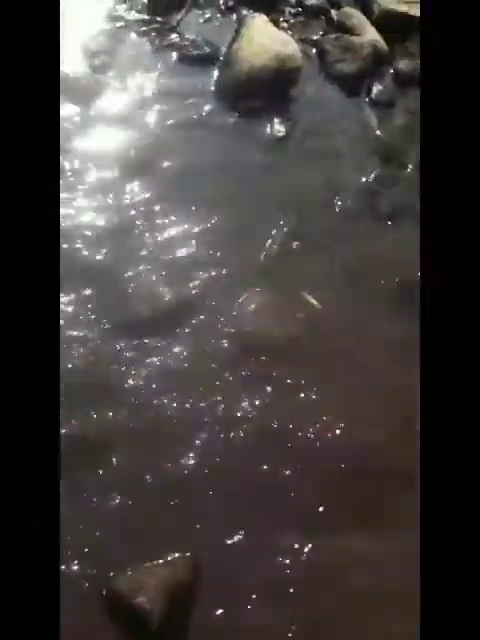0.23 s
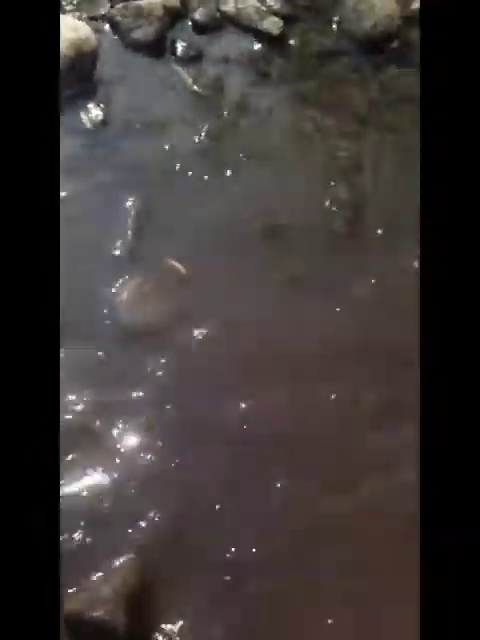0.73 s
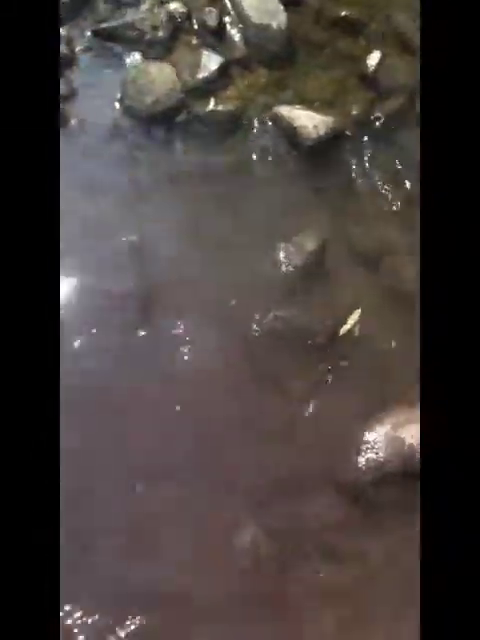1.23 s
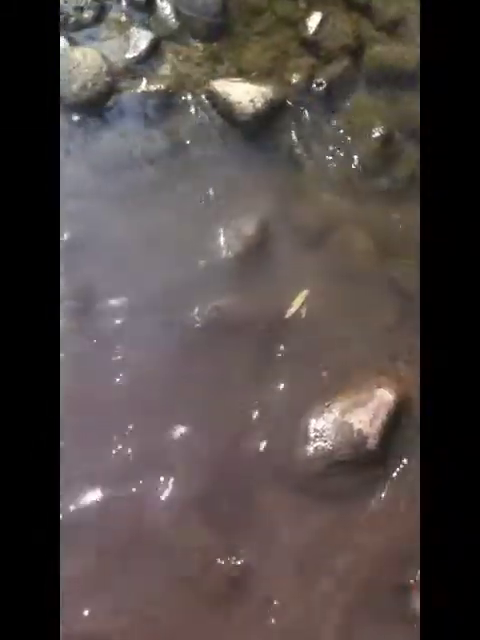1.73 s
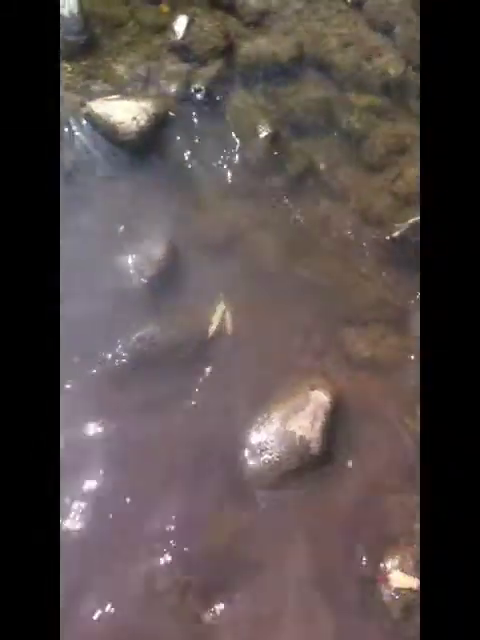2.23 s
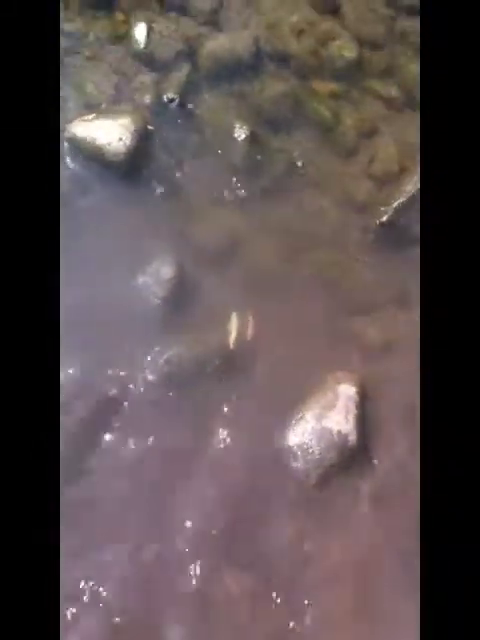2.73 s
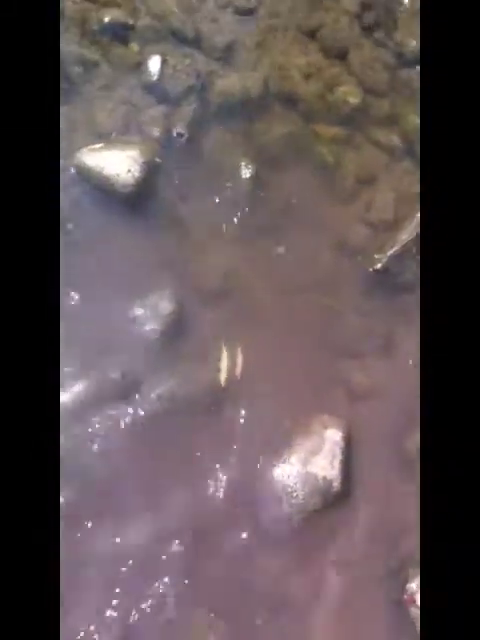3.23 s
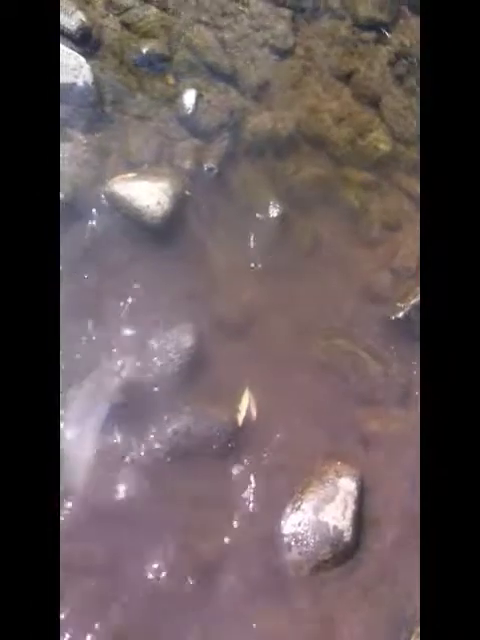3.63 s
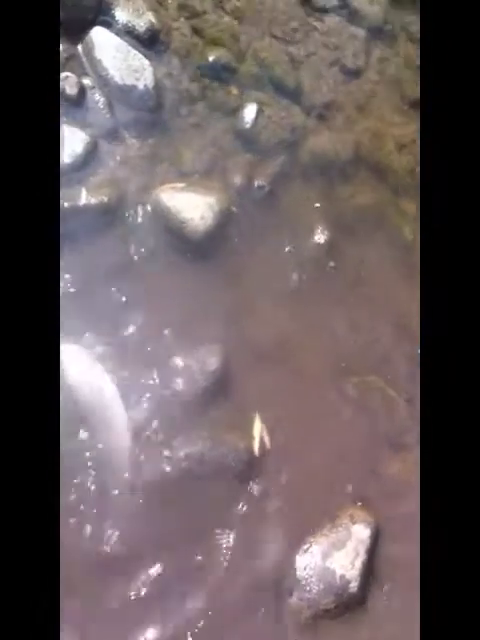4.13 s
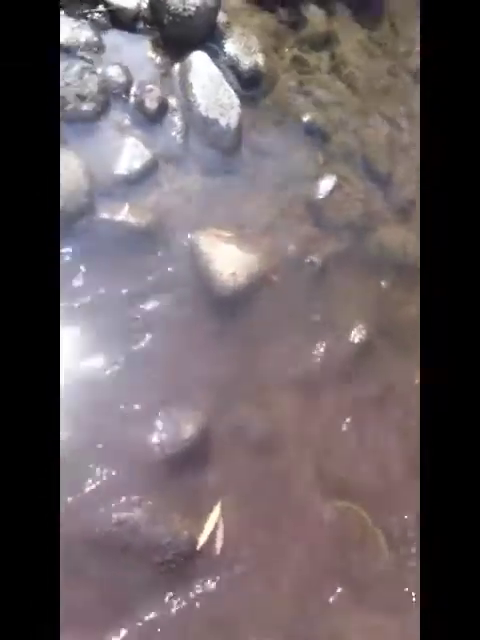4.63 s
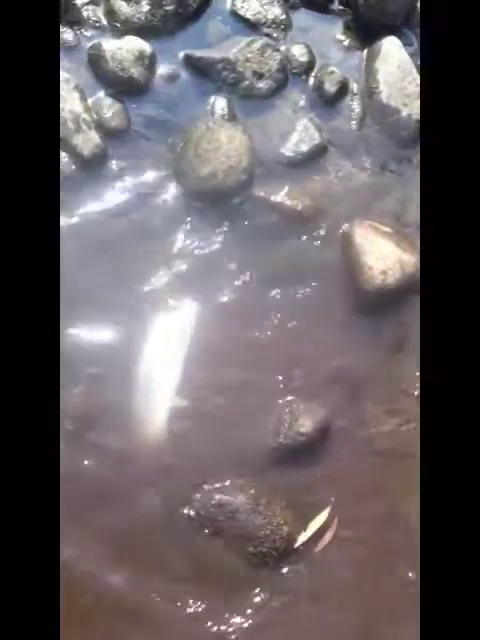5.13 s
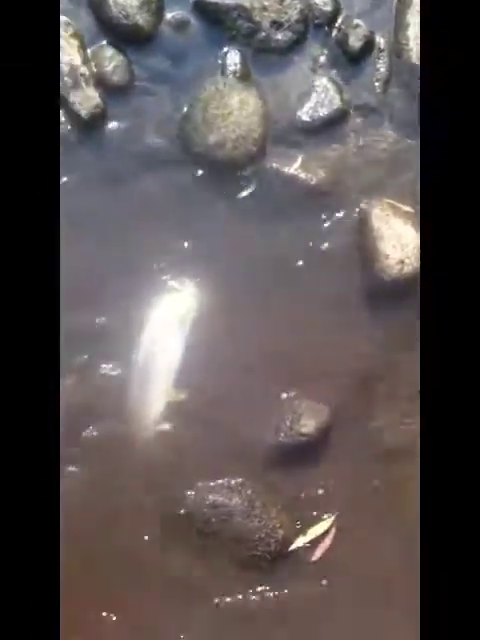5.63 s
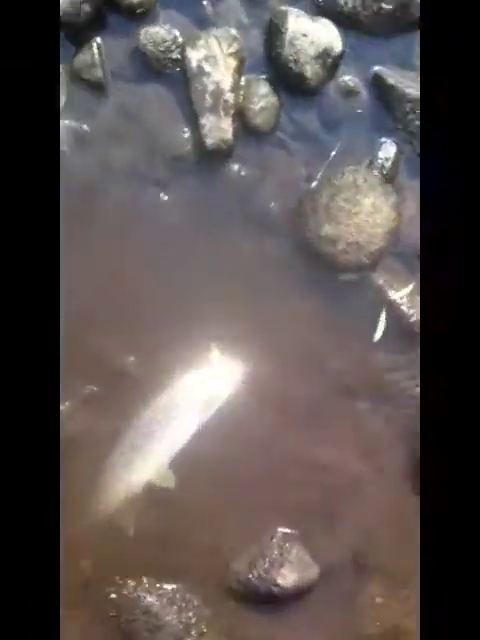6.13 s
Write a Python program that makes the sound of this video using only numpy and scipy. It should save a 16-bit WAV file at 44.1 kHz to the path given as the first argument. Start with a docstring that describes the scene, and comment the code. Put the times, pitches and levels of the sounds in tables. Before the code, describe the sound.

Shallow stream water trickles, plinks and gurgles close up in irregular bursts, insects trill thinly, and low bumps shake the microphone near the end.

```python
"""Shallow rocky stream

Water trickles and sloshes close to a small hand-held microphone: bubbles ring as dying sines with sliding pitch,
drops tick as sharp snaps wrapped in brief hiss, and the riffle hisses further off as patchy noise. Insects trill
and chirp on the bank, with tones and noise pulsed by their wing strokes. Low bumps shake the microphone, mostly
near the end, where something also scrapes it once. A thin high whine runs throughout."""
import sys
import numpy as np
from scipy import signal
from scipy.fft import rfft, irfft
from scipy.io import wavfile
from scipy.ndimage import uniform_filter1d

SR = 44100
rng = np.random.default_rng(int(sys.argv[2]) if len(sys.argv) > 2 else 0)


def transcribe(u):
    """Save the signal u as a 16-bit wav file named by the first command-line argument.

    u: samples, shape (n,) or (channels, n), limited to [-1, 1]; the rate is SR.
    q: integer samples, one column per channel.
    """
    v = np.clip(np.atleast_2d(u).T, -1, 1)
    q = np.round(v * 32767).astype(np.int16)
    wavfile.write(sys.argv[1], SR, q)


def volts(x):
    """Linear amplitude factor 10**(x/20) for a level x in dB, scalar or array-like."""
    e = np.asarray(x, float) / 20
    return 10 ** e


N = 281342  # length in samples

# spectrum of the brightest drops: f/Hz, level/dB
TICK_BRIGHT = [(300, -30.5), (1200, 7.5), (2200, -10.5), (4000, 8.5), (6500, -9.5), (10000, -18),
               (16000, -35)]
# spectrum of the dullest, big drops: f/Hz, level/dB
TICK_DULL = [(300, -13), (800, 15), (1500, -10), (2200, 9), (3200, -19.5), (7000, -14), (16000, -44)]


def evened(x):
    """Scales a sound to an average strength (rms) of 1."""
    return x / np.sqrt(np.mean(x ** 2) + 1e-20)


def read(points, hz):
    """Reads a spectrum between its points, on a log-frequency axis."""
    f, value = np.transpose(points)
    return np.interp(np.log(hz + 1), np.log(f + 1), value)


def level_curve(rows):
    """Turns a table of times and decibels into a factor for every sample."""
    s, db = np.transpose(rows)
    return volts(np.interp(np.arange(N) / SR, s, db))


def add(mix, s, sound):
    """Mixes a sound in at a moment in seconds, cut off at the end of the scene."""
    part = mix[round(s * SR):][:len(sound)]
    part += sound[:len(part)]


def coloured(length, db_at):
    """Noise of rms 1 with the spectrum db_at(hz)."""
    hz = np.fft.rfftfreq(length, 1 / SR)
    spectrum = rfft(rng.standard_normal(length)) * volts(db_at(hz))
    return evened(irfft(spectrum, length))


def wander(span, size=N):
    """Smooth chance of rms 1 that changes over about span samples."""
    once = uniform_filter1d(rng.standard_normal(size), span)
    return evened(uniform_filter1d(once, span))


def resonate(x, hz, width):
    """A resonance applied twice, for steep sides; width in Hz is that of one pass."""
    r = np.exp(-np.pi * width / SR)
    poles = [1, -2 * r * np.cos(2 * np.pi * hz / SR), r * r]
    once = signal.lfilter([1, -1], poles, x)
    return evened(signal.lfilter([1, -1], poles, once))


def whine():
    """The thin tone of the electronics: a sine whose pitch wavers slowly."""
    # steady tones: f/Hz, level/dB
    whine_tones = [(14998, -82)]
    out = np.zeros(N)
    for hz, db in whine_tones:
        pitch = hz + 5 * wander(6000)
        out += volts(db) * np.sqrt(2) * np.sin(2 * np.pi * np.cumsum(pitch) / SR)
    return out


def riffle(patchy_db=1.44, flicker_db=0.67):
    """The far hiss of running water: random short-time spectra with small patches and a shared flicker."""
    # colour of the hiss: f/Hz, level/dB
    hiss_colour = [(35, -40), (60, -3.5), (140, 1.5), (400, -8.5), (800, -5.5), (1200, -4), (1850, -11.5),
                   (4000, -11.5), (6500, -13.5), (8500, -9), (9300, -11), (9900, -18), (12000, -17.5),
                   (14900, -15.5), (15800, -17), (16300, -48)]
    frames, hz = N // 128 + 5, np.fft.rfftfreq(512, 1 / SR)
    a, b, patches = rng.standard_normal((frames, 257, 3)).T
    patches = uniform_filter1d(patches, 6, axis=0)
    patches = evened(uniform_filter1d(patches, 16, axis=1))
    flicker = evened(uniform_filter1d(rng.standard_normal(frames), 6))
    level_db = read(hiss_colour, hz)[:, None] + patchy_db * patches + flicker_db * flicker
    hiss = signal.istft((a + 1j * b) * volts(level_db), nperseg=512, noverlap=384)[1][:N]
    return volts(-62) * evened(hiss)


def trill(strokes, hz, arch_hz=350, drift_hz=70, rasp_hz=110, sharp=3, uneven_db=1.8):
    """A tone let through once a wing stroke; its pitch arches in each stroke and drifts between them."""
    swing, size = np.cos(2 * np.pi * strokes), len(strokes)
    pitch = hz + arch_hz * (swing - .8) + drift_hz * wander(2500, size) + rasp_hz * wander(40, size)
    tone = np.sin(2 * np.pi * np.cumsum(pitch) / SR)
    gate = np.exp(sharp * (swing - 1))
    return evened(gate * volts(uneven_db * wander(700, size)) * tone)


def wing_pulses(strokes, sharp, click_share=.35):
    """Rough noise let through once a wing stroke, plus a click at each stroke."""
    gate = np.exp(sharp * (np.cos(2 * np.pi * strokes) - 1))
    clicks = np.diff(np.floor(strokes), prepend=0)
    noise = evened(gate * rng.standard_normal(len(strokes)))
    return (1 - click_share) * noise + click_share * evened(clicks)


def insects(strokes_per_s=29, chirp_width_hz=200):
    """Trilled phrases over a far chorus, and scattered calls whose wing strokes ring a narrow band."""
    # further insects that never pause: f/Hz, level/dB, wing strokes per second
    chorus = [(8520, -78, 26), (8900, -80, 29.6)]
    # phrases of the nearer trilling insects: t/s of the first wing stroke, length/s, level/dB, f/Hz
    phrases = [(0.018, 0.13, -70.5, 9000), (.286, 0.18, -72, 8600), (0.44, 0.2, -80, 9200),
               (0.719, .3, -72.5, 8850), (1.195, .1, -75, 8050), (1.473, .21, -75, 8700),
               (1.887, .19, -76, 8630), (2.144, 0.2, -73, 8900), (2.492, 0.11, -83, 8700),
               (2.748, 0.22, -70, 9200), (2.98, .105, -76, 8700), (3.15, .14, -76, 8700),
               (3.186, .17, -74, 9100), (3.325, .2, -78, 8700), (3.666, .135, -78, 8950),
               (3.813, 0.11, -75, 8560), (4.082, 0.21, -73.5, 9100), (4.196, 0.29, -75, 8700),
               (4.554, 0.28, -73, 9150), (4.697, 0.14, -74, 8500), (4.935, 0.25, -73, 9100),
               (5.209, 0.15, -71.5, 8600), (5.527, 0.36, -69.5, 8760), (6.035, 0.36, -72.5, 8650)]
    # short chirps at 75 to 78 pulses per second, and a few slower, lower trills:
    # t/s, length/s, level/dB, f/Hz, pulses per second
    calls = [(.4, 0.47, -74.5, 7660, 26), (1.02, 0.28, -71.5, 7640, 29), (1.62, .17, -75, 7700, 78),
             (1.95, 0.12, -73, 7700, 78), (2.28, .12, -77, 7700, 78), (2.39, 0.11, -76, 6800, 75),
             (2.64, .13, -79, 7700, 78), (2.92, .12, -76, 7680, 78), (3.01, .12, -78, 6850, 75),
             (3.22, .13, -74, 7700, 78), (3.34, 0.15, -80, 6940, 75), (3.54, .12, -73, 7640, 78),
             (3.94, .13, -71.5, 7700, 78), (4.27, 0.12, -74, 7600, 78), (4.5, 0.23, -78, 7800, 27),
             (6.22, 0.18, -71, 6850, 75)]
    out = np.zeros(N)
    for hz, db, per_s in chorus:
        strokes = np.cumsum(per_s + 1.5 * wander(9000)) / SR  # the pace wanders a little
        out += volts(db) * trill(strokes, hz)
    for s, length, db, hz in phrases:
        lead = min(s, .5 / strokes_per_s)  # half a stroke of run-up
        t = np.arange(-lead, length + lead, 1 / SR)
        phrase = trill(strokes_per_s * t, hz) * signal.windows.tukey(len(t), .4)
        add(out, s - lead, volts(db) * phrase)
    for s, length, db, hz, per_s in calls:
        t = np.arange(0, length, 1 / SR)
        call = resonate(wing_pulses(per_s * t + .5, sharp=1.8), hz, chirp_width_hz)
        add(out, s, volts(db) * call * signal.windows.tukey(len(t), .4))
    return out


def rumble(body_hz=150, width_hz=110, lumpy_db=3.5):
    """The microphone's low resonance, shaken restlessly by lumpy noise."""
    # strength of the rumble: t/s, level/dB
    restless = [(0., -73), (.35, -68.5), (.8, -76), (1.26, -65.5), (1.6, -76), (2.42, -71), (3.23, -79.5),
                (4.4, -76), (4.58, -68.5), (5.06, -77.5), (5.75, -61), (5.92, -54), (6.18, -65),
                (6.38, -60)]
    lumps = volts(lumpy_db * evened(uniform_filter1d(rng.standard_normal(N), 900)))
    return level_curve(restless) * resonate(lumps * rng.standard_normal(N), body_hz, width_hz)


def bumps(early=.85, sag=.5):
    """Single bumps on the microphone: short low swells that rise faster than they fall, with sagging pitch."""
    # t/s, level/dB, f/Hz, length/s
    knocks = [(2.5645, -50, 148, .027), (4.715, -47.5, 159, 0.028), (5.3518, -44.5, 192, .015),
              (5.641, -40.5, 222, 0.012), (5.6927, -39, 174, 0.014), (5.7148, -37.5, 163, 0.01),
              (5.7451, -35.5, 149, 0.033), (5.7676, -35.5, 163, 0.041), (5.837, -35.5, 174, 0.017),
              (5.8847, -45, 160, .04), (5.9211, -36.5, 180, 0.0257), (5.943, -24, 172, 0.015),
              (5.9593, -31.5, 150, 0.025), (6.0405, -33.5, 177, .018), (6.0892, -37.5, 203, 0.023),
              (6.114, -37.5, 164, 0.016)]
    out = np.zeros(N)
    for s, db, hz, length in knocks:
        t = np.arange(0, length, 1 / SR)
        push = np.sin(np.pi * (t / length) ** early) ** 2
        pitch = hz * (1 + sag * (.45 - t / length))
        phase = 2 * np.pi * np.cumsum(pitch) / SR - np.pi * hz * length
        add(out, s, volts(db) * push * np.cos(phase))
    return out


def scrape(start_s=5.9445, length_s=.019, level_db=-25.5, fade_db=-2):
    """One short scrape on the microphone: gritty noise whose treble swells and fades within the stroke."""
    # colour of the grit: f/Hz, level/dB
    grit_colour = [(60, -12), (160, 1.5), (400, -11), (750, -1.5), (1050, -4.5), (1600, -22.5), (2600, -20),
                   (4200, -21), (6000, -18.5), (10000, -33.5), (16000, -47)]
    size = round(length_s * SR)
    grit = coloured(4096, lambda hz: read(grit_colour, hz))
    low = signal.sosfilt(signal.butter(2, 1500, fs=SR, output="sos"), grit)[-size:]
    treble = (grit[-size:] - low) * 1.3 * signal.windows.tukey(size, .7)
    stroke = evened(low * signal.windows.tukey(size, .22) + treble)
    out = np.zeros(N)
    add(out, start_s, volts(level_db + fade_db * np.arange(size) / size) * stroke)
    return out


def random_drops(per_s, spread_db):
    """Single-sample hits at random moments, a few of them much stronger than the rest."""
    strength = volts(spread_db * np.minimum(rng.exponential(1, N), 4))
    return strength * (rng.random(N) < per_s / SR)


def spray(t60=0.0056):
    """Fine spray falling back after a splash: many tiny drops in a short shower, midway between dull and bright."""
    # t/s, length/s, level/dB
    showers = [(.84, .32, -59.5), (5.6, 0.15, -65.5), (5.856, 0.078, -64), (6.295, 0.085, -54)]
    t = np.arange(0, 4 * t60, 1 / SR)
    grain = signal.oaconvolve(random_drops(per_s=900, spread_db=3.5), volts(-60 * t / t60))[:N]
    patter = grain * coloured(N, lambda hz: .5 * (read(TICK_DULL, hz) + read(TICK_BRIGHT, hz)))
    out = np.zeros(N)
    for s, length, db in showers:
        shower = patter[round(s * SR):][:round(length * SR)]
        add(out, s, volts(db) * evened(shower) * signal.windows.tukey(len(shower), .4))
    return out


def ticks(hiss=0.57, lag_s=.0009, hiss_t60_s=.027, ragged_db=2.5, size=2048):
    """At each impact a faint hiss builds for a millisecond, then comes a sharp snap, then the hiss dies."""
    # drops and splashes hitting the surface: t/s, level/dB, dullness from 0 to 1
    impacts = [(0.0448, -41, 0.2), (.626, -43, 0.7), (.7946, -37, 0.33), (.853, -46, 0.2),
               (0.864, -43, 0.3), (.9348, -41, 0.5), (.9405, -42, .7), (1.0227, -46, 0.2),
               (1.0595, -42, .5), (1.135, -45, 0.4), (1.1505, -31, 0.36), (1.311, -46, 0.9),
               (1.719, -48, .25), (1.7595, -47, .9), (2.1936, -42, .64), (2.2186, -50, 0.2),
               (2.4009, -43, .4), (2.4047, -33.5, 0.32), (2.432, -44, 0.94), (3.164, -49, 0.8),
               (3.948, -52, .5), (3.9933, -44, 0.3), (4.0406, -44.5, 0.25), (5.0633, -45, .55),
               (5.4062, -38, .53), (5.4355, -29, 0.59), (6.0382, -45, .5), (6.2865, -46, .8),
               (6.305, -46, .5), (6.3115, -39.5, 0.6), (6.318, -40, .27), (6.343, -47, .37)]
    out, t, hz = np.zeros(N), np.arange(size) / SR, abs(np.fft.fftfreq(size, 1 / SR))
    for s, db, dull in impacts:
        colour_db = dull * read(TICK_DULL, hz) + (1 - dull) * read(TICK_BRIGHT, hz)
        # no two alike
        colour_db += ragged_db * np.interp(hz, np.geomspace(500, 12000, 14), rng.standard_normal(14))
        # minimum phase: the pulse is as compact and as early as its colour allows
        spectrum = np.exp(np.conj(signal.hilbert(np.log(volts(colour_db)))))
        snap = np.fft.ifft(spectrum).real
        # the surface snaps shut just after first touch
        late = np.roll(snap / abs(snap).max(), round(lag_s * SR))
        tail = coloured(size, lambda f: np.interp(f, hz[:size // 2], colour_db[:size // 2]))
        swell = np.minimum(t / lag_s, 1) ** 2
        add(out, s, volts(db) * (late + hiss * swell * volts(-60 * t / hiss_t60_s) * tail))
    return out


def bubble(hz, t60, rise):
    """A dying sine whose pitch slides by the share rise over t60; positive climbs, negative sags."""
    t = np.arange(int(1.2 * t60 * SR)) / SR
    shape = (1 - np.exp(-t / (0.042 * t60))) * volts(-60 * t / t60)
    return shape * np.sin(2 * np.pi * hz * (t + rise * t ** 2 / (2 * t60)))


def swarm(sizes, per_s, spread_db, cycles, rise, count=36):
    """Bubbles of all sizes at random moments, rms 1; each size has its own ringing time and rise."""
    drops = random_drops(per_s, spread_db)
    kind, out = rng.integers(0, count, N), np.zeros(N)
    for k, hz in enumerate(np.geomspace(sizes[0][0], sizes[-1][0], count)):
        long, up = rng.random(2)
        one = bubble(hz, cycles * (.5 + 2 * long) / hz, 2 * rise * up)
        one = volts(read(sizes, hz)) * one / np.linalg.norm(one)
        out += signal.oaconvolve(drops * (kind == k), one)[:N]
    return evened(out)


def gurgle():
    """Dense small bubbles, louder where the water is stirred, over a steady thin run of longer-ringing ones."""
    # how stirred the water is: t/s, level/dB of the dense bubbles
    stir = [(0., -66), (.17, -58), (.33, -56.5), (.53, -66), (.65, -58.5), (1.05, -58.5), (1.3, -60),
            (1.62, -69), (1.83, -58), (2.18, -72.5), (2.38, -62), (2.9, -69), (3.7, -71.5), (4.42, -66.5),
            (4.81, -60.5), (5.07, -59.5), (5.32, -66), (5.66, -54), (5.86, -60.5), (6.08, -58),
            (6.24, -64.5), (6.38, -49.5)]
    # strength of each bubble size in the gurgle: f/Hz, level/dB
    gurgle_sizes = [(250, -13.5), (450, -4.5), (800, -0.5), (1200, -6), (1700, -17), (2300, -12),
                    (4000, -28)]
    # the same for the thin trickle: f/Hz, level/dB
    trickle_sizes = [(450, -8), (700, -1.5), (1100, 0), (1400, -7), (2500, -14)]
    dense = swarm(gurgle_sizes, per_s=1800, spread_db=3.3, cycles=12, rise=0.36)
    trickle = swarm(trickle_sizes, per_s=60, spread_db=2.6, cycles=30, rise=0.252)
    return level_curve(stir) * dense + volts(-68) * trickle


def bubbles_and_rings():
    """Single bubbles near the microphone, and short pitched rings of the sharpest ticks, all as dying sines."""
    # single bubbles, and short pitched rings of the sharpest ticks: t/s, level/dB, f/Hz at the start,
    # t60/s (time to die by 60 dB), pitch change over the t60 as a share
    rings = [(.0458, -34.5, 3960, 0.0061, -0.52), (.055, -41.5, 2200, 0.025, -0.043),
             (.1551, -42, 600, 0.039, 0.41), (.2162, -41, 620, 0.027, 0.53),
             (0.2839, -41.5, 442, 0.11, 0.0026), (.3232, -43, 656, 0.018, .58),
             (.479, -37.5, 850, 0.021, -0.049), (.6401, -39, 570, 0.02, 0.85), (.6841, -45, 720, 0.048, .6),
             (0.763, -47, 967, .047, 0.19), (.7946, -29, 703, .014, .3), (.7953, -30, 4100, 0.0052, -.23),
             (0.7995, -38, 1520, .026, -0.077), (0.8273, -38, 769, 0.072, 0.97),
             (.8536, -42, 3150, 0.019, -.34), (.8659, -38, 2710, .0044, 0), (0.8688, -40, 2430, .03, -0.23),
             (.8753, -39.5, 674, .098, 0.94), (0.9026, -36.5, 1641, 0.0089, -0.51),
             (.9201, -38, 1485, 0.027, -.28), (0.9423, -34, 1010, .01, 0.45),
             (.9525, -33.5, 1098, .014, .3), (.9622, -38, 1040, .04, 0.28), (.9746, -40, 1400, 0.016, -.2),
             (1.0235, -43, 2332, 0.023, -0.11), (1.0276, -41, 4070, .0086, 1.),
             (1.0495, -42.5, 820, 0.064, .7), (1.0665, -42.5, 2020, 0.033, .6),
             (1.0907, -35.5, 484, 0.11, 0.95), (1.1152, -36.5, 660, .092, 1.),
             (1.135, -37, 4500, .0045, 0.22), (1.1505, -36, 1430, 0.023, .25),
             (1.1541, -34, 2730, 0.008, 0.33), (1.1779, -35, 2451, 0.011, -.26),
             (1.2385, -36.5, 400, .016, -.22), (1.3115, -41, 2350, .012, 0),
             (1.3121, -36, 814, 0.032, 0.12), (1.7197, -44, 2849, .012, -0.27),
             (1.7593, -42.5, 1000, 0.074, 0.21), (1.8136, -39, 630, 0.049, -0.23),
             (1.8137, -37.5, 890, .039, 0), (1.9568, -45.5, 1050, 0.053, 0.75),
             (2.1763, -39, 1950, .0105, 1.), (2.219, -34, 1970, 0.014, 0.75),
             (2.3371, -32, 466, 0.012, -0.21), (2.3676, -36, 547, 0.015, 0.9),
             (2.4005, -34, 2010, .011, 0.73), (2.406, -27, 912, 0.05, -0.22),
             (2.4333, -47, 2300, 0.016, -.36), (2.4782, -45, 687, 0.043, -0.083),
             (2.5437, -46, 692, .065, .7), (2.698, -44, 988, 0.015, .7), (2.9493, -43.5, 1302, .026, 0),
             (3.0286, -49, 593, .088, .04), (3.115, -45, 1220, .05, .4), (3.4766, -46, 1126, .04, 0),
             (3.038, -45.5, 2020, .023, 0.19), (3.2959, -47, 1040, 0.039, 0),
             (3.4255, -43, 1130, 0.038, -0.2), (3.4812, -48, 650, .06, -.1), (3.604, -47, 1059, .025, .7),
             (3.164, -47, 2350, .012, 0), (3.989, -45.5, 1059, .042, .39), (4.3122, -47, 815, .052, 0),
             (1.1287, -44, 1290, .047, -.2), (.4612, -46, 696, .05, .3), (1.2769, -47, 655, .095, 0),
             (3.5618, -38, 4000, .0049, -0.33), (3.676, -45.5, 2260, .014, .18),
             (3.8849, -44.5, 920, 0.074, 1), (3.9932, -43.5, 4047, .0099, -.2),
             (4.041, -36.5, 1960, .014, .67), (4.6947, -42, 543, 0.08, 0.79), (4.789, -29, 518, 0.015, 0),
             (4.9506, -43.5, 950, .026, -0.38), (5.052, -36.5, 1000, 0.037, .11),
             (5.0628, -36, 2206, 0.032, 0.27), (5.4077, -30.5, 3380, 0.0049, -0.0069),
             (5.4362, -22, 2140, 0.0099, -0.037), (5.4367, -19.5, 705, 0.0099, -0.085),
             (5.4379, -34, 1020, .017, -0.49), (5.4862, -42, 480, 0.026, -0.32),
             (6.2863, -36.5, 573, 0.029, .74), (6.3126, -38, 665, .06, 0.73),
             (6.32, -38, 4360, .0035, 0.19), (6.3212, -29.5, 520, 0.011, -0.16),
             (6.33, -34, 3480, .005, .08), (6.3341, -37, 2451, .0082, -.2)]
    out = np.zeros(N)
    for s, db, hz, t60, rise in rings:
        add(out, s, volts(db) * bubble(hz, t60, rise))
    return out


def scene():
    """Water, insects and the shaken microphone, on one channel."""
    shaken = rumble() + bumps() + scrape()
    water = riffle() + spray() + ticks() + gurgle() + bubbles_and_rings()
    return (insects() + shaken + water)[None]


def band_limit(x):
    """A steep low-pass at the top of the band."""
    return signal.sosfilt(signal.butter(12, 16420, fs=SR, output="sos"), x)


def record(dry):
    """A faint whine joins and the bass below 78 Hz is cut."""
    bass_cut = signal.butter(2, 78, "high", fs=SR, output="sos")
    mix = signal.sosfilt(bass_cut, dry + whine())
    return band_limit(mix)


dry = scene()
out = record(dry)
transcribe(out)
```